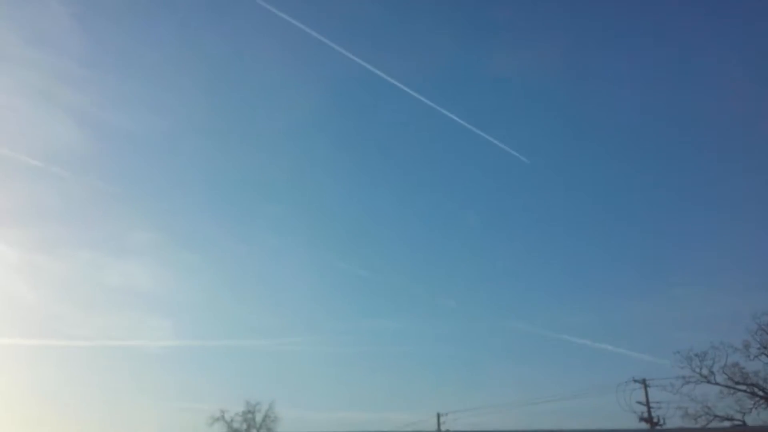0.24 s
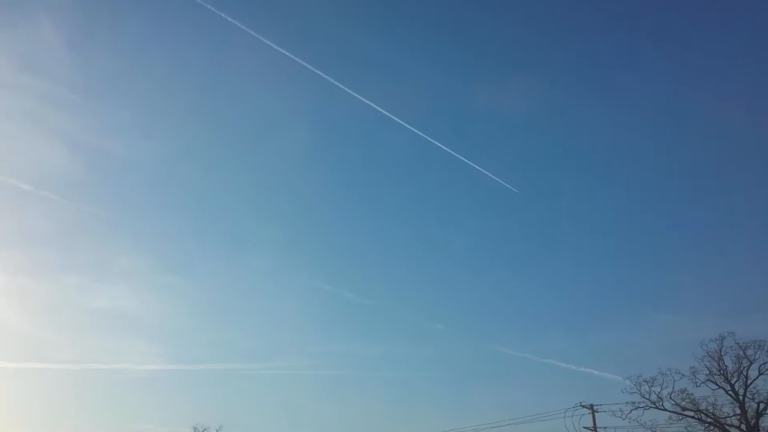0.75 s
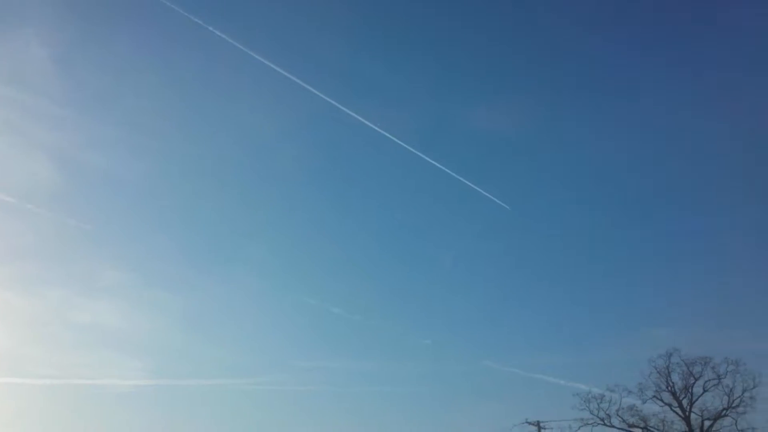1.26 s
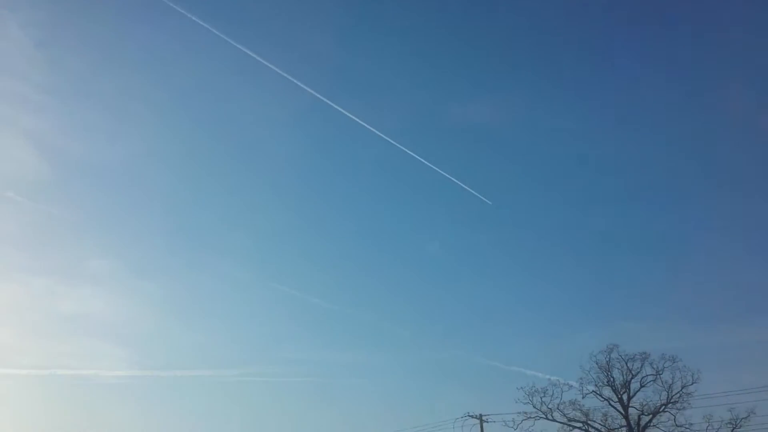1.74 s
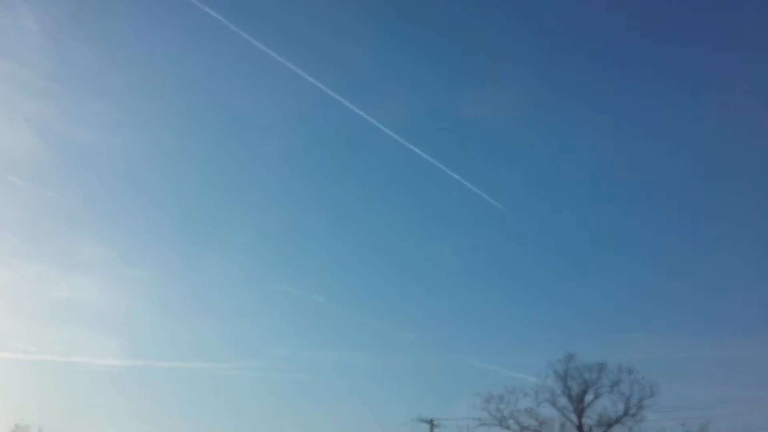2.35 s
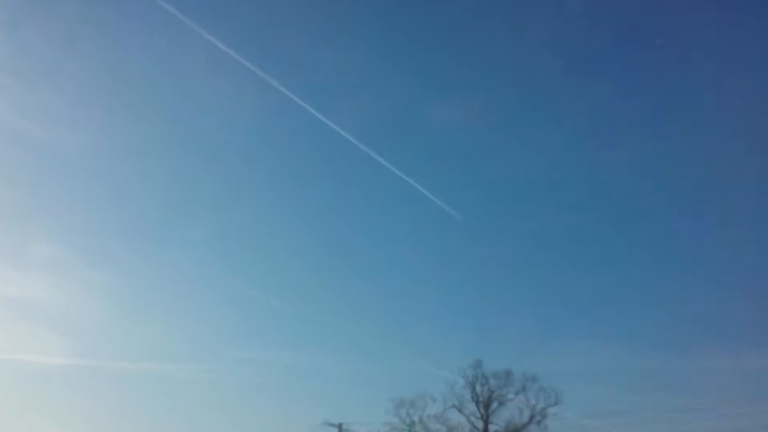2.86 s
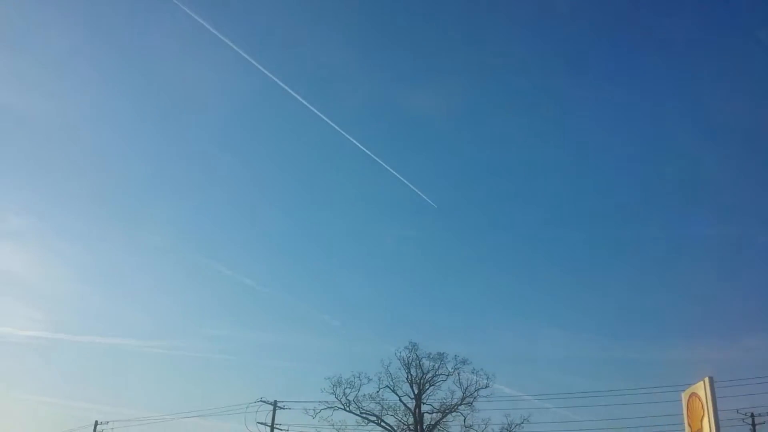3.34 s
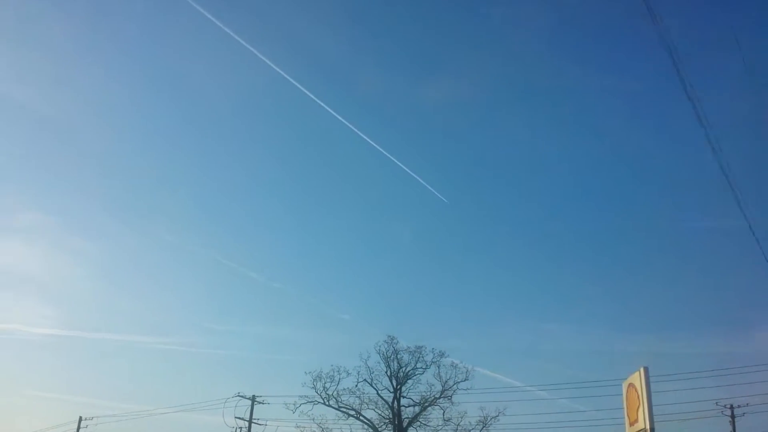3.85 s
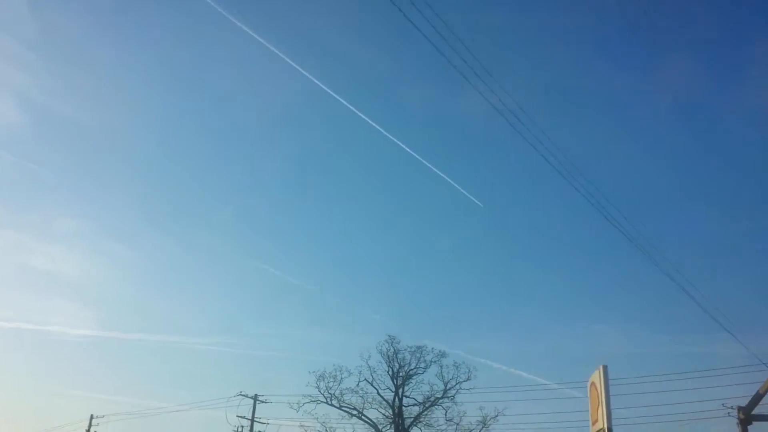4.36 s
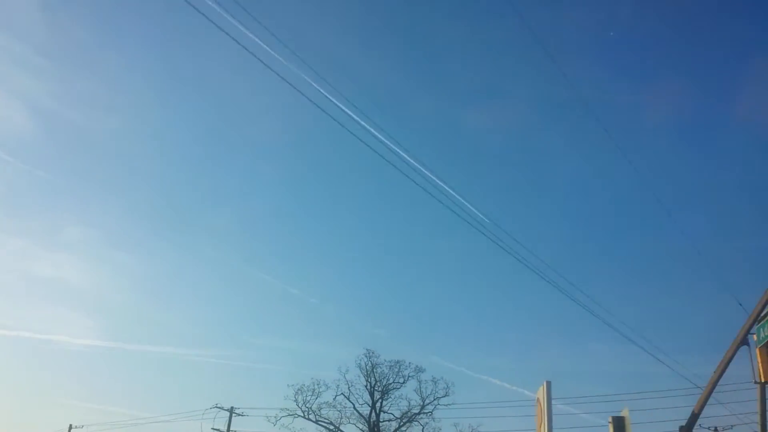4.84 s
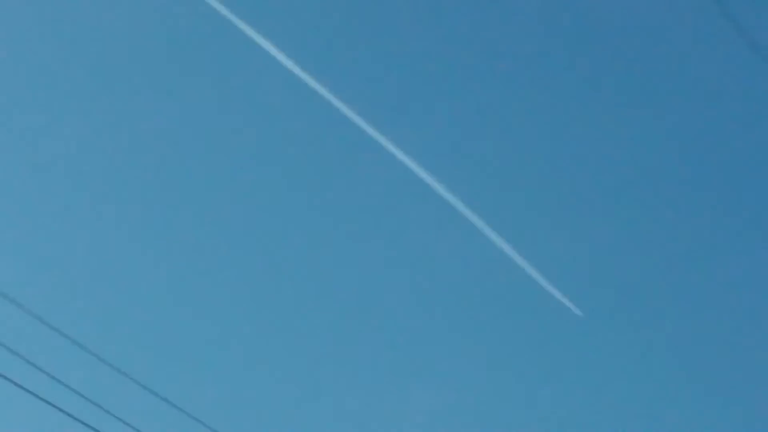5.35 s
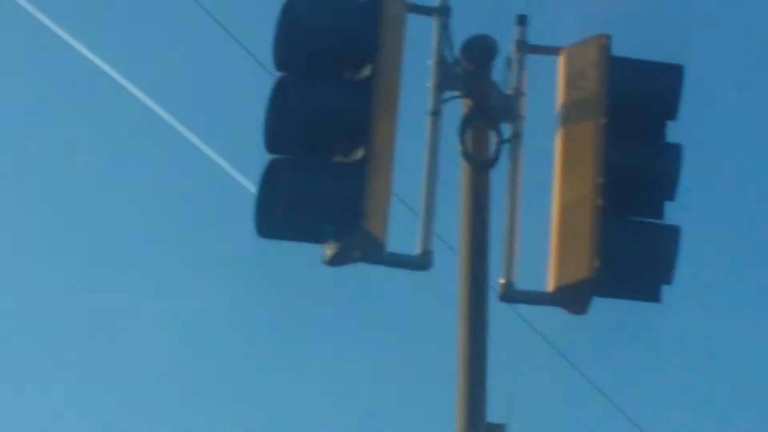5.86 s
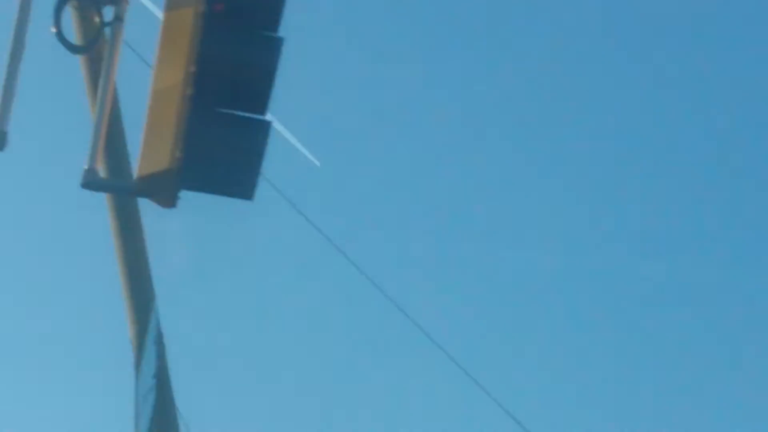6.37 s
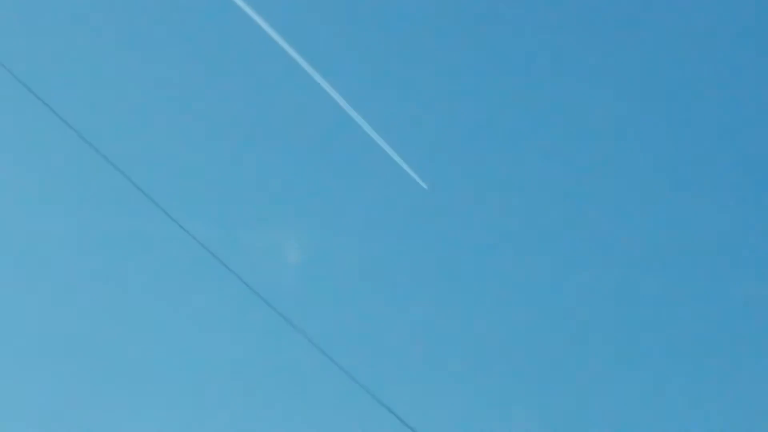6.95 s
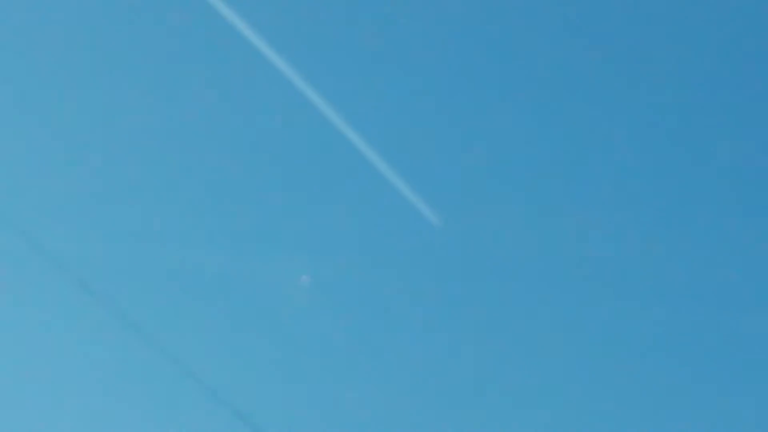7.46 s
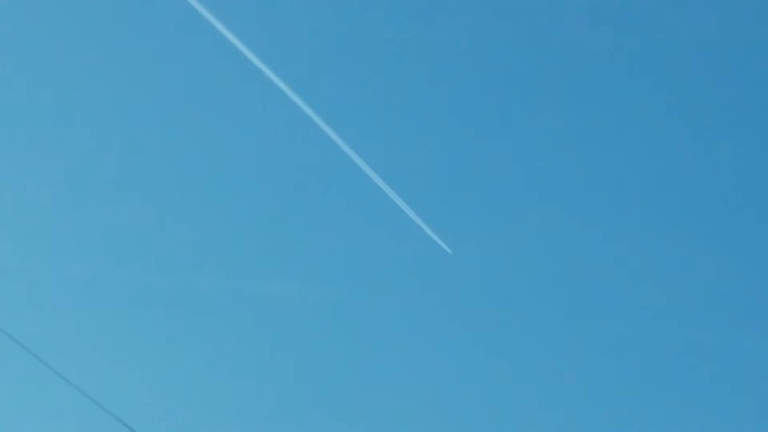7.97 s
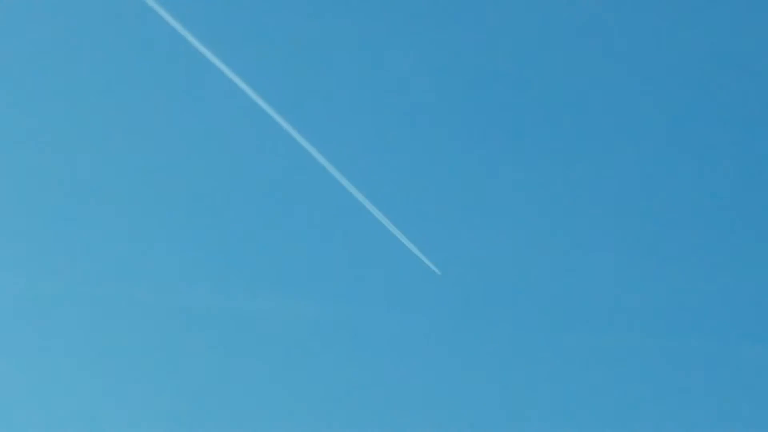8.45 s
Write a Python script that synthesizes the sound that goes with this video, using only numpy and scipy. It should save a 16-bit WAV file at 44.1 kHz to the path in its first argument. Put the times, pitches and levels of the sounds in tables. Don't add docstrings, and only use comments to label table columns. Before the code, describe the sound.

Heard from inside a car, a strong low engine drone swells for about a second and a half, then fades as the throttle lifts. Throbbing tyre rumble and booming rough road remain, slowly sinking as the car slows. Soft quick ticks run at the right, and air hisses past behind. Fingers shift on the hand-held stereo microphone, giving rubs, bright cracks and hard knocks, strongest past the middle.

```python
import sys
import numpy as np
from scipy import signal
from scipy.fft import rfft, irfft, next_fast_len
from scipy.io import wavfile

SR = 44100
rng = np.random.default_rng(int(sys.argv[2]) if len(sys.argv) > 2 else 0)


def digitize_waveform(pressure):
    field = np.atleast_2d(pressure).T
    bounded = np.clip(field, -1, 1)
    quanta = np.round(bounded * 32767).astype(np.int16)
    wavfile.write(sys.argv[1], SR, quanta)


def to_linear_factor(level_db):
    exponent = np.asarray(level_db, float) / 20
    return 10 ** exponent


N = 384111

# time_s, firing_hz, drone_db
ENGINE_DRONE = [
    (0, 112.6, -12),
    (.62, 111.5, -12.5),
    (1.1, 116.3, -11),
    (1.4, 114.8, -10.5),
    (1.55, 111, -19.5),
    (1.78, 104.5, -27.5),
    (1.92, 101.8, -39),
    (2.2, 97, -34),
    (2.5, 92.1, -53),
]
# multiple, first_db, full_load_db
ENGINE_OVERTONES = [(5, -25, -13), (6, -32.5, -19.5), (12, -27, -26), (16, -18, -19.5), (17, -21.5, -25.5),
                    (19, -33.5, -21), (20, -22.5, -27), (21, -23, -25), (24, -21, -34.5),
                    (26, -22.5, -31.5), (33, -39.5, -54), (40, -54, -52.5), (48, -53.5, -55),
                    (56, -43, -49.5), (65.8, -58, -59)]
# start_s, end_s
LOAD_RISE = (0.8, 1.15)
# start_s, end_s
LOAD_FALL = (1.97, 2.82)
# time_s, centre_hz, coarseness_db
ROAD_SPEED = [(0, 78, -1), (.6, 78, 3.5), (1.2, 79.4, -2.5), (1.95, 77.5, -3.5), (2.5, 75, -1.5),
              (3.0, 72.5, 2), (3.6, 71, 1), (4.3, 69, -0.5), (5.0, 63, 2), (5.7, 58, -2.5), (6.5, 46, 3.5),
              (7.6, 44, -4), (8.71, 40, -4)]
# share_of_centre, level_db
TREAD_LINES = [(0.781, -18.5), (0.999, 0), (1.169, -3)]

# full_speed_db, per_speed_octave_db, load_db, coarseness_share
THROB_DRIVE = (-26, 14, 6, 0.56)
SHAKE_DRIVE = (-41.5, -3.5, -8, -1.2)
BOOM_DRIVE = (-31, 7.5, 1, 0.76)
FLOOR_DRIVE = (-32.5, 6, 0, 0.04)
ROAR_DRIVE = (-49, 3, 4, 0.2)
HISS_DRIVE = (-54, 3.5, 4, 0.04)
SELF_NOISE_DRIVE = (-63, 3.1, -10.5, -0.3)

# pitch_hz, level_db (per Hz)
SHAKE_COLOUR = [(18, -35), (28, -6.5), (42, -1.5), (52, -8), (70, -31.5)]
BOOM_COLOUR = [(45, -31), (60, -4), (85, -4), (95, -3.5), (105, -4), (118, -0.5), (130, -2.5), (158, -10),
               (172, -4), (185, -14.5), (220, -35)]
FLOOR_COLOUR = [(170, -33), (200, -6), (215, -4), (227, 2.5), (241, -8.5), (257, 1), (273, -9.5), (290, -4),
                (320, -15.5), (345, -12), (410, -19.5), (490, -20), (600, -27), (800, -65)]
ROAR_COLOUR = [(350, -33.5), (480, -5.5), (700, -6), (900, -7.5), (1400, -14), (2100, -15.5), (3100, -15),
               (3800, -21), (4600, -28.5)]
HISS_COLOUR = [(3000, -10), (4300, -5), (5500, -0.5), (6500, 1.5), (7500, -3.5), (9000, -9), (11000, -17.5),
               (13000, -20), (15000, -37.5)]
SKIN_COLOUR = [(1500, -40), (2200, -11), (3700, -11), (5000, -4.5), (6850, 0.5), (9000, -10),
               (11900, -16.5), (14500, -22.5)]
PALM_COLOUR = [(800, -25), (1150, -3), (1450, 0), (1900, -8), (3200, -9), (4200, -25)]
SELF_NOISE_COLOUR = [(6000, -14), (9000, -1), (12000, -3.5), (14500, -6), (15000, -4.5)]
# pitch_hz, likeness (1 = same)
PORT_LIKENESS = [(60, 0.92), (130, .995), (290, 1), (500, 0.64), (900, 0.043), (1400, 0), (14200, 0.0022)]
# pitch_hz, left_minus_right_db
PORT_TILT = [(60, -0.5), (110, 1), (200, 0), (370, -2), (680, 3), (1250, -1), (2290, -7), (4210, 0),
             (7720, -3), (14200, 0)]

# start_s, end_s, first_hz, last_hz, level_db
PANEL_HUMS = [(1.3, 2.41, 75, 73, -26.5), (3.07, 3.55, 117, 117, -28), (2.548, 7, 62, 49, -31.5),
              (5.9, 6.7, 88, 100, -34.5), (6.9, 7.5, 97, 93, -33), (7.7, 9.2, 116, 116, -35),
              (6.5, 9.44, 256, 252, -45.5), (2.4, 3.4, 291, 290, -42.5), (2.3, 3.4, 158, 152, -32.5),
              (2.4, 3.3, 205, 200, -41.5), (4.18, 6.13, 228, 226, -46)]
# time_s, knock_db, left_minus_right_db, knock_hz, snap_db
CASE_KNOCKS = [(4.4118, -32, 10, 1097, -37), (4.4226, -37, -7, 860, -45), (4.4243, -21.5, 13.5, 1090, -14),
               (4.7881, -25, -14, 603, -26), (4.818, -26, -7.5, 840, -10), (4.8513, -35, 16, 710, -34),
               (4.884, -36, 3, 796, -43), (4.918, -51, -5, 800, -33), (4.9705, -36, 10, 865, -38),
               (5.248, -39, -6, 860, -37.5), (5.3987, -38, 12, 905, -37), (5.5475, -23, -5, 890, -10),
               (5.5657, -19, 14, 1580, -23), (5.5656, -21, 10, 557, -37), (5.5789, -11.5, 6.5, 1220, -18.5),
               (8.447, -35, -5, 780, -53)]
# time_s, crack_db, left_minus_right_db
PORT_CRACKS = [(2.1445, -23.5, 11.5), (3.761, -27, 3), (3.803, -27, 2.5), (4.4243, -18, 10),
               (4.819, -28, -11), (4.828, -39, 2), (4.848, -21, 5), (4.8514, -27.5, 16), (4.4116, -33.5, 7),
               (4.8552, -30, -5), (4.918, -33, -7), (4.9705, -35, 11), (5.3982, -41, 9),
               (5.4857, -35.5, 14.5), (5.577, -26.5, 13), (5.5789, -20.5, 0.5), (5.602, -34.5, 3),
               (5.7214, -25.5, 4), (4.885, -41, -2), (8.448, -44, -1), (3.7264, -34, -2),
               (6.129, -18, -0.5), (7.30, -38, -10)]
# peak_s, swell_s, fade_s, skin_db, palm_db
FINGER_RUBS = [(1.8, 0.081, .08, -48, -80), (3.735, .015, .02, -44, -80), (3.803, 0.073, 0.019, -35.5, -60),
               (3.99, 0.18, .11, -50, -51.5), (4.3, 0.26, 0.18, -53, -80), (5.72, 0.18, 0.22, -58, -68),
               (5.83, 0.084, .04, -68, -55), (6.126, 0.017, 0.081, -40, -81), (6.6, .09, 0.13, -48, -51),
               (6.85, .1, .06, -55, -80), (7.78, 0.079, 0.077, -48.5, -49.5), (8.52, .03, .05, -60, -81),
               (8.66, 0.21, .1, -47.5, -50.5)]
# time_s, rounds_done
VALVE_ROUNDS = [
    (.05, -18),
    (2.485, 0),
    (4.572, 15),
    (5.671, 22),
    (6.352, 26),
    (7.141, 31),
    (8.755, 40),
]
# share_of_round, pitch_hz, level_db
VALVE_TICKS = [
    (0, 4070, -45),
    (.38, 4050, -44),
    (.63, 3970, -44.5),
]
# time_s, half_width_s, rise_db
WINDOW_GUSTS = [
    (4.03, 0.47, 6),
    (5.8, 0.25, 6),
    (6.7, 0.46, 4),
    (8.75, 0.16, 12),
]


def rms_one(x):
    return x / np.sqrt(np.mean(x ** 2) + 1e-20)


def in_time(rows):
    s, *columns = np.transpose(rows)
    return [np.interp(np.arange(N) / SR, s, c) for c in columns]


def at_hz(points, hz):
    table_hz, table_db = np.transpose(points)
    return np.interp(np.log(hz), np.log(table_hz), table_db)


def drift(rate_hz):
    r = np.exp(-80 * np.pi * rate_hz / SR)
    noise = rng.standard_normal(N // 40 + 2002)
    slow = signal.lfilter([1], [1, -2 * r, r * r], noise)[2000:]
    return np.interp(np.arange(N) / 40, np.arange(len(slow)), rms_one(slow))


def ring(hits, hz, t60_s):
    r = to_linear_factor(-60 / (t60_s * SR))
    w = 2 * np.pi * hz / SR
    return signal.lfilter([0, np.sin(w)], [1, -2 * r * np.cos(w), r * r], hits + 1e-18)


def coloured(colour):
    size = next_fast_len(N)
    hz = np.maximum(np.arange(size // 2 + 1) * SR / size, 1)
    shared, opposite = rfft(rng.standard_normal((2, size)))
    alike = np.clip(at_hz(PORT_LIKENESS, hz), -1, 1)
    pair = np.sqrt(1 + alike) * shared + np.sqrt(1 - alike) * opposite * [[1], [-1]]
    inside = (hz > colour[0][0]) & (hz < colour[-1][0])
    gain = to_linear_factor(at_hz(colour, hz) + at_hz(PORT_TILT, hz) * [[.5], [-.5]]) * inside
    return rms_one(irfft(pair * gain, size)[:, :N])


def drive(law):
    fast_db, per_octave_db, load_db, coarse_share = law
    centre_hz, coarse_db = in_time(ROAD_SPEED)
    load = np.interp(np.arange(N) / SR, LOAD_FALL, [1, 0])
    speed_octaves = np.log2(centre_hz / 78)
    return fast_db + per_octave_db * speed_octaves + load_db * load + coarse_share * coarse_db


def engine():
    firing_hz, drone_db = in_time(ENGINE_DRONE)
    cycle = 2 * np.pi * np.cumsum(firing_hz) / 8 / SR
    load = np.interp(np.arange(N) / SR, LOAD_RISE, [0, 1])
    out = np.sin(8 * cycle - 1 + 0.32 * drift(22)) * to_linear_factor(0.61 * drift(9.4))
    for multiple, first_db, loaded_db in ENGINE_OVERTONES:
        level = to_linear_factor(first_db + load * (loaded_db - first_db) + 0.5 * drift(4.8))
        phase = rng.uniform(0, 7) + 0.12 * drift(4.7)
        out += level * np.sin(round(multiple) * cycle + phase)
    return np.sqrt(2) * to_linear_factor(drone_db) * out


def throb():
    turn = 2 * np.pi * np.cumsum(in_time(ROAD_SPEED)[0]) / SR
    wander_hz = 4
    out = np.zeros(N)
    for share, level_db in TREAD_LINES:
        wave = drift(wander_hz) * np.cos(share * turn) + drift(wander_hz) * np.sin(share * turn)
        out += to_linear_factor(level_db) * wave
    return to_linear_factor(drive(THROB_DRIVE) - 3) * out


def road():
    patch_db, patches_per_s = 0.8, 1.7
    parts = [(SHAKE_DRIVE, 0, SHAKE_COLOUR), (BOOM_DRIVE, 7.5, BOOM_COLOUR), (FLOOR_DRIVE, 0, FLOOR_COLOUR)]
    out = np.zeros((2, N))
    for law, gain_db, colour in parts:
        level_db = drive(law) + gain_db + patch_db * drift(patches_per_s)
        out += to_linear_factor(level_db) * coloured(colour)
    return out


def hums():
    t, out = np.arange(N) / SR, np.zeros(N)
    for start_s, end_s, first_hz, last_hz, level_db in PANEL_HUMS:
        share = np.clip((t - start_s) / (end_s - start_s), 0, 1)
        turn = 2 * np.pi * np.cumsum(first_hz + share * (last_hz - first_hz)) / SR
        swell = np.sqrt(np.abs(np.sin(np.pi * share))) * (share < 1)
        level = to_linear_factor(level_db + 3 + 1.2 * drift(3))
        out += level * swell * np.sin(turn + 0.5 * drift(3.1))
    return out


def port_lags(pan_db):
    return enumerate((0, 18 if pan_db > -4.5 else -6))


def knocks():
    out, t = np.zeros((2, N + 900)), np.arange(400) / SR
    swings = .82
    for s, knock_db, pan_db, knock_hz, snap_db in CASE_KNOCKS:
        tune = 1 + .05 * rng.normal(0, 1, 2)
        knock_shape = np.exp(-t * knock_hz / swings) * (1 - np.exp(-t / 0.00016))
        knock = -to_linear_factor(knock_db + 4) * np.sin(2 * np.pi * knock_hz * t) * knock_shape
        snap_shape = np.exp(-t / 0.00015) * (1 - np.exp(-t / 0.00006))
        for side, lag in port_lags(pan_db):
            snap = -to_linear_factor(snap_db + 7.5) * np.sin(2 * np.pi * 2700 * tune[side] * t) * snap_shape
            at = round(s * SR) + lag
            early = at - 6 - lag // 2
            gain = to_linear_factor(pan_db * (.5 - side))
            out[side, early:early + len(t)] += gain * knock
            out[side, at:at + len(t)] += gain * snap
    return out[:, :N]


def cracks():
    out, t = np.zeros((2, N + 900)), np.arange(400) / SR
    for s, crack_db, pan_db in PORT_CRACKS:
        tune = 1 + .05 * rng.normal(0, 1, 2)
        for side, lag in port_lags(pan_db):
            low = np.sin(2 * np.pi * 5900 * tune[side] * t)
            high = 0.43 * np.sin(2 * np.pi * 8400 * tune[side] * t)
            crack = to_linear_factor(crack_db + 2) * (low + high) * np.exp(-t / 0.00023)
            at = round(s * SR) + lag
            out[side, at:at + len(t)] += to_linear_factor(pan_db * (.5 - side)) * crack
    return out[:, :N]


def rubs():
    t, skin, palm = np.arange(N) / SR, np.zeros(N), np.zeros(N)
    for s, swell_s, fade_s, skin_db, palm_db in FINGER_RUBS:
        away = np.where(t < s, (s - t) / abs(swell_s), (t - s) / abs(fade_s))
        pressure = to_linear_factor(-16 * np.minimum(away, 9) ** 1.15)
        skin += to_linear_factor(skin_db) * pressure
        palm += to_linear_factor(palm_db) * pressure
    skin_noise = skin * to_linear_factor(1.9 * drift(70)) * coloured(SKIN_COLOUR)
    palm_noise = palm * to_linear_factor(1.1 * drift(40)) * coloured(PALM_COLOUR)
    return skin_noise + palm_noise


def valve():
    s, rounds = np.transpose(VALVE_ROUNDS)
    out = np.zeros(N)
    for share, hz, level_db in VALVE_TICKS:
        at = (np.interp(np.arange(-18, 40) + share, rounds, s) * SR).astype(int) - 150
        hits = np.zeros(N + SR)
        hits[at] = to_linear_factor(level_db + rng.normal(-2.3, 3, len(at)))
        first_ring = ring(hits[:N], hz, .018)
        out += 0.016 * ring(first_ring, hz * 1.018, 0.022)
    return out * to_linear_factor([[-9], [0]])


def air():
    t = np.arange(N) / SR
    gust_db = np.zeros(N)
    for s, half_s, rise_db in WINDOW_GUSTS:
        gust_db += rise_db * np.exp(-2 * ((t - s) / half_s) ** 2)
    roar_db = drive(ROAR_DRIVE) + 0.29 * gust_db + 0.65 * drift(5.1)
    hiss_db = drive(HISS_DRIVE) + gust_db + .5 * drift(21)
    white = rng.standard_normal((2, N))
    whistle = rms_one(ring(ring(white, 6820, 0.027), 6820, 0.027))
    whistle_db = np.interp(t, [1.5, 3.5], [-9, -26])
    hiss = coloured(HISS_COLOUR) + to_linear_factor(whistle_db) * whistle
    return to_linear_factor(roar_db) * coloured(ROAR_COLOUR) + to_linear_factor(hiss_db) * hiss


def later(pair):
    return np.array([pair[0], np.pad(pair[1], (8, 0), "edge")[:N]])


def scene():
    car = engine() + throb() + road() + hums()
    hand = knocks() + cracks() + rubs()
    return later(car) + hand + valve() + air()


def band_limit(x):
    return signal.sosfilt(signal.butter(12, 14770, fs=SR, output="sos"), x)


def record(dry):
    noise = to_linear_factor(drive(SELF_NOISE_DRIVE)) * coloured(SELF_NOISE_COLOUR)
    rounded = 0.8 * np.tanh((dry + noise) / 0.79)
    top_cut = signal.cheby2(14, 50, 15100, fs=SR, output="sos")
    running = signal.sosfilt_zi(top_cut)[:, None] * rounded[None, :, :1]
    finished = signal.sosfilt(top_cut, rounded, zi=running)[0]
    return band_limit(finished)


dry = scene()
out = record(dry)
digitize_waveform(out)
```